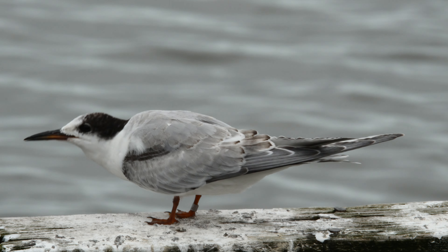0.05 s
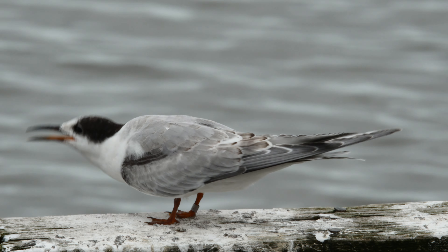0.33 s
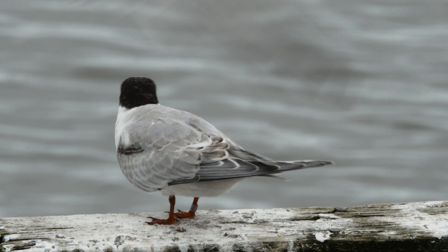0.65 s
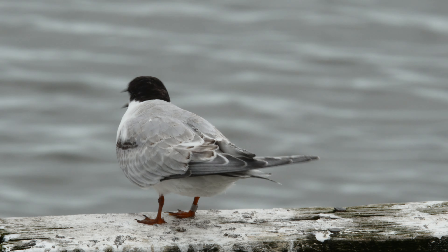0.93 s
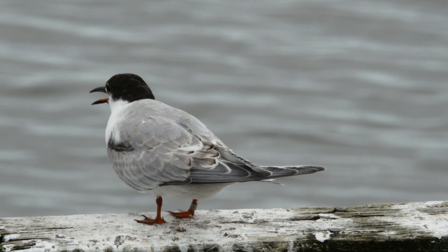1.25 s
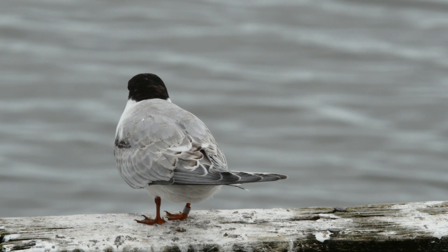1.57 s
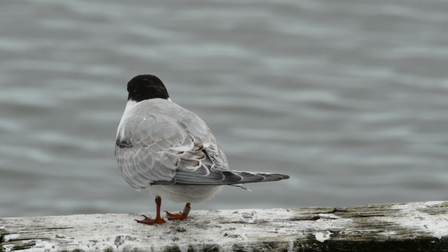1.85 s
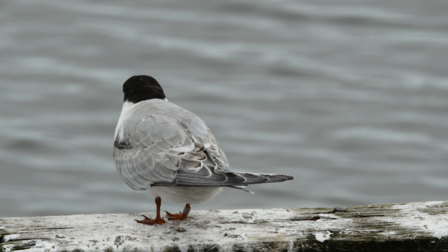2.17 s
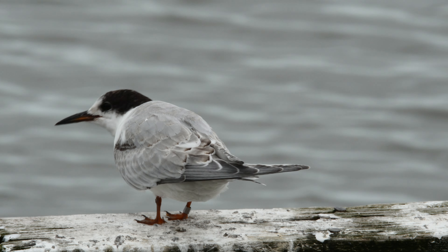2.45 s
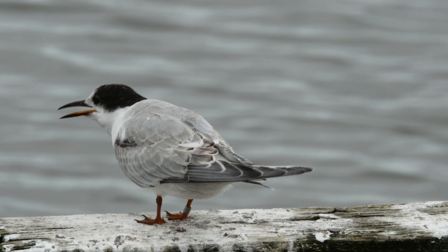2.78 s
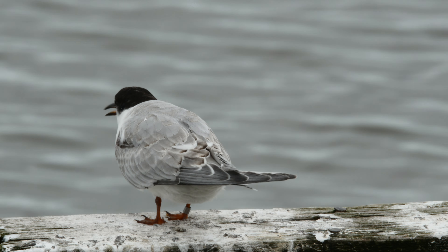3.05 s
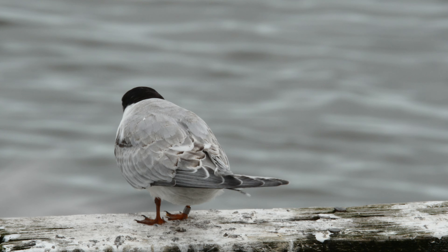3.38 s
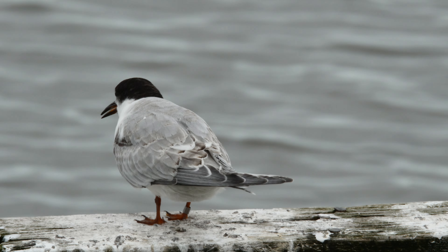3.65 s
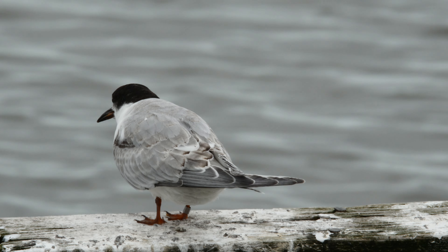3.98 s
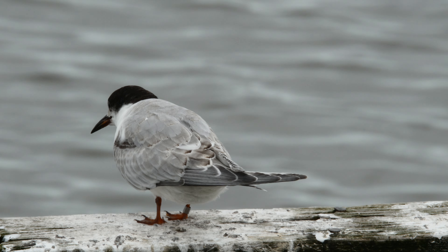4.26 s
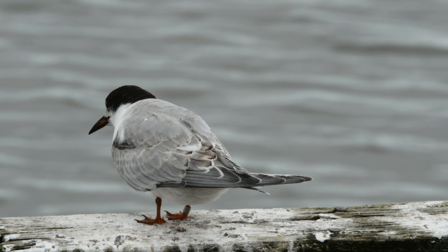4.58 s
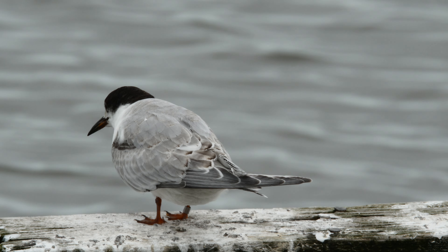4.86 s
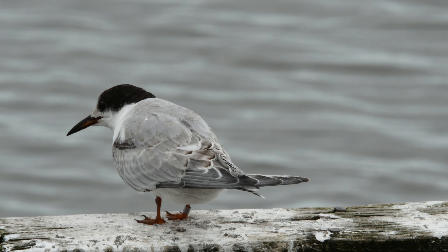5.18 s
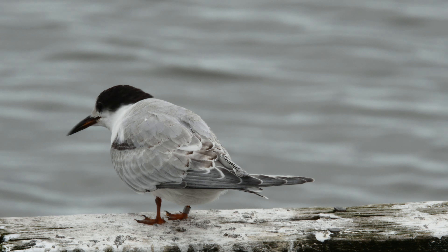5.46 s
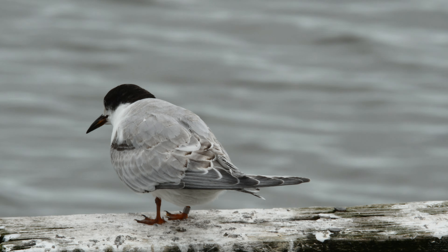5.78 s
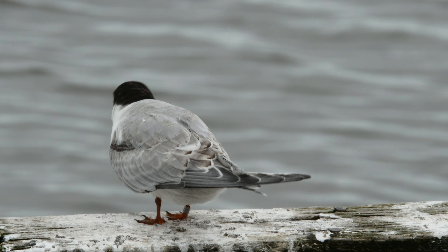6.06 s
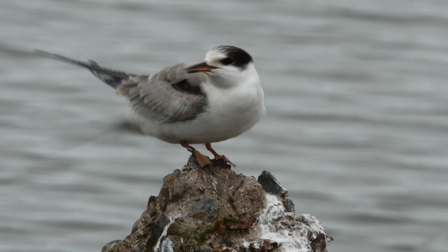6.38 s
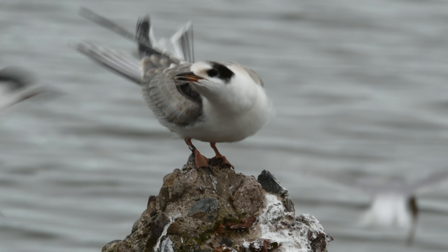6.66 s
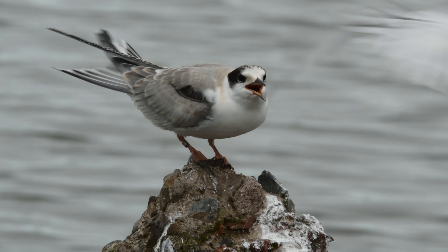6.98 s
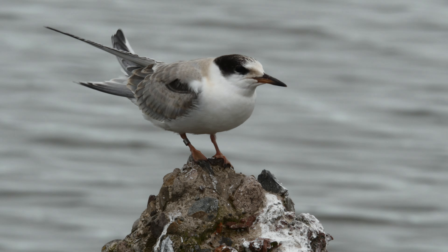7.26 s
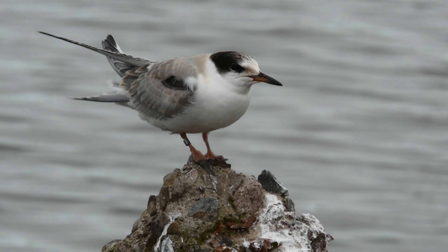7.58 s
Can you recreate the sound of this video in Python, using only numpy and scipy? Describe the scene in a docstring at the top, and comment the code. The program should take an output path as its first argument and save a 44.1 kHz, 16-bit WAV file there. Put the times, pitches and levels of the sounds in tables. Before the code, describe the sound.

From the start, terns call close by and slightly to the left, with high, trilled cries overlapping a nearly unbroken run of harsh rasps. A distant colony chorus and a faint, low wash of wind and waves lie underneath. A steep squawk comes at about 0.8 seconds and a soft, deeper croak at 2.5. The calls are strongest for the first three seconds, ease a little, then swell again with another squawk near 5.9. At about 6.4 seconds the sound drops out for an instant and returns at a quieter spot on the shore, with gentle water noise and thin, far calls. One hoarse, stuttering screech runs from 6.8 to 7.1 seconds, followed at 7.2 by a sharp, close kip. A few soft splashes and swishes come between 6.6 and 7.8 seconds, with a last faint call just before the end, near 8 seconds.

```python
"""A tern colony by the water. Near the microphone, trilled, arching cries around 3 kHz (the syrinx
sounding a tone) overlap with harsh rasps (its slaps ringing throat and beak), over a far chorus and
a low wash of wind and waves. After a brief dropout comes a quieter spot on the shore: thin far
calls, one hoarse screech, a sharp close "kip" and a few soft splashes."""
import sys
import numpy as np
from scipy import signal
from scipy.fft import rfft, irfft
from scipy.io import wavfile
from scipy.ndimage import uniform_filter1d, map_coordinates

SR = 44100
rng = np.random.default_rng(int(sys.argv[2]) if len(sys.argv) > 2 else 0)


def generate_wav(signal):
    """Clip the signal to [-1, 1] and save it as 16-bit WAV at the path in sys.argv[1]."""
    frames = np.transpose(np.atleast_2d(signal))
    scaled = np.clip(frames, -1, 1) * 32767
    pcm = np.round(scaled).astype(np.int16)
    wavfile.write(sys.argv[1], SR, pcm)


N = 344862
TIME = np.arange(N) / SR
COLONY_END_S, SHORE_START_S = 6.358, 6.388
TRILL_DEPTH = .5
VOICED = .6   # share of a rasp's power in its reedy pulses


def from_db(db):
    """Decibels to gain."""
    return 10 ** (np.asarray(db) / 20)


def rms_one(x):
    """Scale to unit power."""
    return x / np.sqrt(np.mean(x ** 2) + 1e-20)


def at_hz(points, hz):
    """Read a spectrum on a log-frequency axis."""
    f, value = np.transpose(points)
    return np.interp(np.log(hz + 1e-3), np.log(f), value)


def drift(rate, size=N):
    """A random curve of spread about 1 that turns rate times a second."""
    at = np.arange(size) * rate / SR + rng.random()
    knots = int(at[-1]) + 2
    return 1.2 * np.interp(at, np.arange(knots), rng.standard_normal(knots))


def phase_of(hz):
    """Running phase of a changing frequency."""
    return 2 * np.pi * np.cumsum(hz) / SR


def ramp(start, length):
    """Rises from 0 to 1 over length seconds."""
    return np.clip((TIME - start) / length, 0, 1)


def swelling(u, swell_db):
    """A rounded unit-power envelope over u = 0..1, leaning towards its start or end."""
    return rms_one(np.abs(np.sin(np.pi * u)) ** .35 * from_db(swell_db * u))


def resonate(x, modes):
    """Parallel resonances (f/Hz, width/Hz, relative level/dB); unit power."""
    out = 0
    for hz, width, db in modes:
        band = [max(hz - width / 2, 15), min(hz + width / 2, .45 * SR)]
        out += from_db(db) * signal.sosfilt(signal.butter(2, band, "band", fs=SR, output="sos"), x)
    return rms_one(out)


def bend(x, speed):
    """Read a sound at a changing speed, moving pitch and resonances together."""
    return map_coordinates(x, [np.cumsum(speed)], order=3, mode="mirror")


def place(x, pan_db, lag=.6):
    """Pan by left minus right level; the left microphone leads by a fraction of a sample."""
    left, right = gains = from_db([pan_db / 2, -pan_db / 2])
    late = (1 - lag) * x + lag * np.roll(x, 1)
    return np.array([left * x, right * late]) / gains.mean()


def add(out, start, sound):
    """Mix a stereo sound in at start seconds."""
    i = int(np.clip(start * SR, 0, N - 1))
    out[:, i:i + sound.shape[1]] += sound[:, :N - i]


def syrinx(pitch, harmonics_db, rough, flutter=.5, side_db=-60):
    """A membrane tone that shakes when forced; flutter, at a share of the pitch, adds side tones."""
    size = len(pitch)
    phase = phase_of(pitch * (1 + .03 * rough * drift(1100, size)))
    flicker_db = 5.5 * np.sqrt(rough)
    tone = sum(from_db(db + flicker_db * np.tanh(drift(35, size))) * np.sin(k * phase)
               for k, db in enumerate(harmonics_db, 1))
    flutter_phase = phase_of(flutter * pitch * (1 + .16 * drift(500, size)))
    sides = np.sin(phase + flutter_phase) + from_db(-13) * np.sin(phase - flutter_phase)
    sides *= from_db(side_db + 5.3 * drift(25.2, size))
    shimmer = 1 + .34 * rough * drift(1400, size)
    return np.sqrt(2) * (tone + sides) * shimmer


def contour(hz, glide, arch):
    """First, middle and last pitch of a call; glide and arch are shares of the pitch."""
    return hz * (1 - arch - glide / 2), hz, hz * (1 - arch + glide / 2)


def overtones(hz, db):
    """Levels of four harmonics after throat and beak."""
    # response of throat and beak: f/Hz, level/dB
    colour = [(5000, -1), (5800, -1.5), (6500, 1), (7200, -8), (8000, -17), (8800, -7), (9900, -3),
              (11000, -5), (11800, -16), (13500, -22)]
    return [0, *(db + at_hz(colour, hz * np.arange(2, 5)))]


def cry(length, pitches, swell_db, harmonics_db, trill, rough, flutter, side_db, trill_hz=60):
    """One note through three pitches, chopped by a fast trill that also bends it."""
    size = max(int(length * SR), 256)
    u = np.linspace(0, 1, size)
    beat = np.sin(phase_of(trill_hz * (1 + .12 * drift(26.6, size))))
    pitch = np.polyval(np.polyfit([0, .5, 1], pitches, 2), u)
    pitch *= 1 - .04 * np.exp(-u * length / .009)   # scoops up to the note
    pitch *= 1 + .008 * trill * beat + .009 * drift(150, size)
    chop = 1 + trill * np.tanh(1.34 * beat + .46)
    return rms_one(swelling(u, swell_db) * chop * syrinx(pitch, harmonics_db, rough, flutter, side_db))


def single_cries(trim_db=1.0, arch=.007):
    """Birds that stand out, each from its own direction; rough cries trill and flutter more."""
    # start t/s, end t/s, f/Hz, glide/share, level/dB, swell/dB, overtones/dB, roughness/0-1, pan/dB
    cries = [(0, .141, 2920, -.05, -54, -12, -3, .46, -11), (0, .116, 3210, -.01, -47.5, -17, -19, .56, -7),
             (.138, .25, 3300, .02, -43.5, -4, -11, .23, -4),
             (.323, .585, 3330, .02, -48, -11, -13.5, .9, -6),
             (.856, .985, 3295, -.06, -46, 6, -18, .28, -5),
             (.945, 1.04, 3780, -.03, -52, -3, -18, .45, -6),
             (.955, 1.14, 2900, -.055, -49, -3, -11, .4, -5), (.97, 1.1, 3190, -.02, -54, -3, -20, .5, -6),
             (1.255, 1.43, 3395, -.02, -54.5, -11, -6.5, .36, -1.5),
             (1.36, 1.493, 3160, .01, -55, -20, -22, .5, -9),
             (1.365, 1.45, 3760, .01, -55, -2, -22, .5, -7),
             (1.542, 1.708, 2937, .01, -51, -5.5, -9, .4, -2.5),
             (1.686, 1.83, 3060, -.02, -49.5, -3, -19, .7, -8),
             (1.795, 2.06, 3180, -.035, -52.5, -9, -11, .64, -2),
             (2.152, 2.268, 2900, .065, -52.5, 10, -9, .55, -11),
             (2.244, 2.422, 3290, -.04, -44.5, 2, -14.5, .25, -7.5),
             (2.26, 2.43, 2970, -.01, -54, -2, -18, .55, -8), (2.34, 2.43, 4050, 0, -53, 3, -26, .6, -7),
             (2.465, 2.62, 3200, -.07, -49.5, -3, -18, .35, -8),
             (2.485, 2.661, 2860, -.03, -52.5, 1, -13, .55, -4),
             (2.653, 2.769, 3200, .01, -57, -1, -3, .4, 1),
             (2.775, 2.96, 3220, .05, -49.5, -3, -22, .3, -4),
             (3.11, 3.25, 2960, .02, -57, 0, -10, .6, -10),
             (3.22, 3.377, 2640, -.02, -60, -6, -23, .77, -9), (3.34, 3.5, 3360, .07, -64, 0, -24, .5, -6),
             (3.48, 3.69, 3080, -.09, -60, -2, -24, .6, -6),
             (3.548, 3.723, 2530, -.14, -57, -11, -20, .84, -9),
             (3.74, 3.869, 3550, -.16, -56, 5, -14, .3, -8),
             (3.766, 3.982, 2770, -.095, -54.5, -2, -14, .42, -4),
             (4.271, 4.498, 3393, -.11, -51.5, 6, -19, .4, -10),
             (4.5, 4.63, 3030, -.05, -63, 0, -7, .5, -6), (4.59, 4.79, 2850, -.11, -58, -2, -16, .35, -2),
             (4.822, 4.97, 3004, -.03, -63, 4, -7.5, .46, -3),
             (4.947, 5.12, 3327, -.12, -56, -3, -20, .51, -12),
             (5.08, 5.22, 3220, 0, -60, -3, -18, .45, -8), (5.21, 5.32, 3060, -.03, -60, 2, -9, .4, -5),
             (5.286, 5.47, 2850, -.065, -56.5, -4, -10, .55, -6),
             (5.535, 5.66, 3350, -.1, -59, 0, -6, .55, -9),
             (5.597, 5.648, 3110, .01, -51, 6, -23, .25, -13),
             (5.666, 5.773, 2950, -.02, -62, -8, -22, .4, -8),
             (5.804, 5.919, 3380, .03, -53.5, 8, -33, .42, -11),
             (6.024, 6.112, 3510, 0, -48, 1, -30, .65, -14),
             (6.33, 6.62, 3390, -.035, -76.5, -2, -16, 0, -1),
             (7.12, 7.218, 3330, -.03, -69, 6, -18, .03, 17), (7.742, 7.86, 2805, -.01, -69, 5, -18, 0, 11)]
    out = np.zeros((2, N))
    for row, flutter in zip(cries, rng.uniform(.17, .36, len(cries))):
        start, end, hz, glide, db, swell_db, overtone_db, rough, pan_db = row
        trill = TRILL_DEPTH * np.tanh(6 * rough)
        note = cry(end - start, contour(hz, glide, arch), swell_db, overtones(hz, overtone_db),
                   trill, rough, flutter, side_db=-19 + 9 * rough)
        add(out, start, from_db(db + trim_db) * place(note, pan_db))
    return out


def hoarse_pulses(size, pulse_hz, trill_db=2.5, trill_hz=58, burst_s=.00079, breath=.47, buzz=.3):
    """The syrinx slaps shut at uneven intervals: each slap is a click and a burst of turbulence."""
    cycles = np.cumsum(pulse_hz * np.exp(.2 * drift(150, size) + .15 * drift(10, size))) / SR
    slaps = np.diff(np.floor(cycles), prepend=0) * from_db(2 * np.clip(rng.standard_normal(size), -2, 2))
    bursts = rms_one(signal.lfilter([1], [1, -np.exp(-1 / (burst_s * SR))], slaps + 1e-18))
    trill = np.sin(phase_of(trill_hz * np.exp(.25 * drift(20, size))))
    turbulence = (bursts + breath) * rng.standard_normal(size)
    flow = (buzz * rms_one(slaps) + turbulence) * from_db(trill_db * trill)
    local_power = np.abs(uniform_filter1d(flow ** 2, SR // 25))
    return flow / np.sqrt(local_power + 1e-9)


def reedy_pulses(size, pulse_hz, trill_db=3.5, trill_hz=52, uneven_db=3.0):
    """The voiced part of a rasp: nearly regular slaps of uneven strength, under a trill."""
    cycles = np.cumsum(pulse_hz * (1 + .02 * drift(400, size) + .012 * drift(25, size))) / SR
    trill = np.sin(phase_of(trill_hz * (1 + .15 * drift(20, size))))
    strength = from_db(uneven_db * drift(600, size) + trill_db * trill)
    return rms_one(np.diff(np.floor(cycles), prepend=0) * strength)


def near_rasps(mouth_hz=5950, arch=.02, pan_db=-6.2):
    """Harsh "kaar" calls nearby: pulses ring throat, mouth and chest; the open beak hisses."""
    # start t/s, end t/s, lower throat f/Hz, upper throat f/Hz, pulse f/Hz, upper throat level/dB,
    # swell/dB, then relative to the upper throat: mouth/dB, chest/dB, beak/dB
    rasps = [(0, .316, 3450, 4100, 412, -51, -.5, -15, -18, -16),
             (.312, .735, 3300, 4200, 365, -51, -5, -11, -14, -11.5),
             (.825, .968, 3450, 4000, 415, -55.5, -4, -14, -18.5, -11),
             (.953, 1.287, 3170, 3800, 420, -50.5, -1, -14, -18, -13.5),
             (1.352, 1.556, 3230, 3850, 535, -56, -6, -18, -17, -28),
             (1.544, 1.766, 3020, 3850, 415, -57, 2, -8, -15, -8.5),
             (1.788, 2.133, 3170, 3900, 525, -59, -3, -18, -17, -30),
             (2.159, 2.492, 3270, 4000, 405, -54, 8, -13, -30, -17),
             (2.472, 2.729, 3050, 4550, 395, -57, 0, -6, -16, -11),
             (2.721, 2.981, 3270, 4300, 400, -56, -.5, -7, -16.5, -12),
             (2.949, 3.261, 3080, 4200, 375, -53, -6, -9, -18.5, -16),
             (3.222, 3.413, 3170, 4400, 440, -68, -4, -10, -11.5, -21),
             (3.469, 3.733, 3200, 4400, 440, -65, -13, -10, -12, -26),
             (3.739, 4.135, 3010, 3920, 370, -61, .5, -10, -13, -12),
             (4.248, 4.619, 3260, 4000, 440, -62, -8, -9, -15, -10),
             (4.581, 4.857, 2910, 3900, 365, -66, 5, -7, -7, -13),
             (4.821, 5.234, 3100, 3980, 435, -63, -2, -5, -12, -9.5),
             (5.269, 5.509, 3000, 4700, 385, -60.5, 3, -5, -10.5, -11.5),
             (5.5, 5.817, 3000, 4500, 430, -65, -5, -6, -9.5, -7.5),
             (5.852, 6.202, 3200, 4450, 497, -53.5, 0, -10, -12.5, -9),
             (6.162, 6.431, 3250, 4400, 460, -60.5, 2, -8, -13, -7)]
    # resonances of chest and open beak: f/Hz, width/Hz, level/dB
    chest_modes = [(850, 248, -6), (1220, 240, -2.5), (1633, 180, 2), (2000, 380, 1)]
    beak_modes = [(9670, 350, -14), (9600, 1800, 8), (11900, 1900, 3), (13400, 4600, 1)]
    out = np.zeros((2, N))
    for start, end, lower_hz, upper_hz, pulse_hz, db, swell_db, mouth_db, chest_db, beak_db in rasps:
        u = np.linspace(0, 1, int((end - start) * SR))
        padded = len(u) + 2000
        hoarse = hoarse_pulses(padded, pulse_hz)
        pulses = np.sqrt(VOICED) * reedy_pulses(padded, pulse_hz) + np.sqrt(1 - VOICED) * hoarse
        lower_db = -52.5 + .78 * (db + 52)   # grows less than the rest: a harder rasp is brighter
        lower = from_db(lower_db) * resonate(pulses, [(lower_hz, 560, 0)])
        upper = resonate(pulses, [(upper_hz, 860, 0)])
        flank = from_db(-11) * resonate(hoarse_pulses(padded, pulse_hz), [(upper_hz, 1720, 0)])
        mouth = from_db(mouth_db) * resonate(np.roll(pulses, 300), [(mouth_hz, 1100, 0)])
        chest = from_db(chest_db) * resonate(hoarse, chest_modes)
        beak = from_db(beak_db) * resonate(hoarse, beak_modes)
        voice = lower + from_db(db) * (upper + flank + mouth + chest + beak)
        # the resonances rise and fall as the beak opens and closes
        voice = bend(voice, 1 + arch * (np.sin(np.pi * u) - 2 / np.pi))
        add(out, start, place(swelling(u, swell_db) * voice, pan_db + rng.uniform(-1.2, 1.2)))
    return out


def far_chorus(count=70, centre_hz=3080, spread=.16, level_db=-64):
    """Many distant birds give the same falling cry, each at its own pitch; their rasps merge."""
    # resonances of the far throats: f/Hz, width/Hz, level/dB
    throat = [(1813, 460, -5), (2990, 590, 0), (4170, 890, -5.5), (6070, 480, -10), (9900, 1660, -13),
              (12800, 2200, -19)]
    cries = np.zeros((2, N))
    for k, (when, length, height, side) in enumerate(rng.random((count, 4))):
        hz = centre_hz * (1 + spread * (2 * height - 1))
        note = cry(.15 + .2 * length, (hz * 1.1, hz, hz * .94), swell_db=0, harmonics_db=[0, -16, -24],
                   trill=.99, rough=.6, flutter=.25 + .25 * when, side_db=-9)
        start = (k + when) / count * COLONY_END_S - .15
        add(cries, start, place(note, -4 + 10 * (side - .5)))
    rasps = np.array([resonate(hoarse_pulses(N, pulse_hz=500), throat) for _ in range(2)])
    return from_db(level_db) * (rms_one(cries) + rasps * from_db([[-1.5], [1.5]]))


def wash(spectrum):
    """Far wind and waves: gently wavering noise, most alike at both microphones in the low range."""
    # likeness of left and right: f/Hz, correlation/0-1
    likeness = [(30, 0.41), (90, .75), (180, 0.83), (350, 0.93), (700, 0.54), (1500, 0.1), (12000, 0.55)]
    hz = np.fft.rfftfreq(N, 1 / SR)
    mid, side = rfft(rng.standard_normal((2, N)))
    alike = at_hz(likeness, hz)
    stereo = np.sqrt(1 + alike) * mid + np.sqrt(1 - alike) * side * [[1], [-1]]
    noise = irfft(from_db(at_hz(spectrum, hz)) * stereo, N)
    return rms_one(noise) * from_db(.6 * drift(7))


def far_drone(level_db=-80):
    """A faint drone in the distance: three narrow bands of noise."""
    # drone bands: f/Hz, width/Hz, level/dB
    bands = [(94, 24, -22.5), (144, 17.5, -15), (442.4, 24, -17.5)]
    return from_db(level_db) * resonate(rng.standard_normal(N), bands)


def low_tones(trim_db=-3.0):
    """Low hoarse tones under the cries, including the undertones of the second squawk."""
    # start t/s, end t/s, f/Hz, glide/share, level/dB
    tones = [(.32, .44, 1650, .05, -67), (2.47, 2.63, 1890, 0, -66), (3.11, 3.27, 1610, .02, -59),
             (3.84, 4.06, 1880, -.04, -70), (4.6, 4.86, 1820, -.1, -69), (5.28, 5.5, 1950, -.02, -69),
             (5.54, 5.86, 1750, -.03, -70), (5.87, 6.03, 1540, .03, -66), (5.87, 6.04, 2340, .03, -59)]
    out = np.zeros((2, N))
    for start, end, hz, glide, db in tones:
        note = cry(end - start, contour(hz, glide, arch=.015), swell_db=0, harmonics_db=[0, -8],
                   trill=TRILL_DEPTH, rough=1.7, flutter=.1, side_db=-6)
        add(out, start, from_db(db + trim_db) * place(note, pan_db=-8))
    return out


def squawks():
    """Steeply arched cries to the right, forced until the membrane flutters at half the pitch."""
    # start t/s, end t/s, f/Hz, glide/share, arch/share, level/dB, swell/dB, overtones/dB, side tones/dB
    calls = [(.745, .85, 3230, .13, .12, -53, -11, -7, -10), (5.91, 6.04, 3150, -.03, .06, -50, -1, 5, -2)]
    out = np.zeros((2, N))
    for start, end, hz, glide, arch, db, swell_db, overtone_db, side_db in calls:
        harmonics_db = overtones(hz, overtone_db) + np.array([0, 0, -9, 0])
        note = cry(end - start, contour(hz, glide, arch), swell_db, harmonics_db,
                   trill=.6, rough=.45, flutter=.5, side_db=side_db)
        add(out, start, from_db(db) * place(note, pan_db=-12.5))
    return out


def low_croak(start_s=2.5, length_s=.25, level_db=-65.5, pulse_hz=300):
    """A deeper-voiced bird croaks once: slapping pulses in a larger throat."""
    # throat resonances: f/Hz, width/Hz, level/dB
    throat = [(740, 180, -5), (1180, 260, -3), (1830, 380, 0)]
    out = np.zeros((2, N))
    u = np.linspace(0, 1, int(length_s * SR))
    voice = swelling(u, swell_db=-7) * resonate(hoarse_pulses(len(u), pulse_hz), throat)
    add(out, start_s, from_db(level_db) * place(voice, pan_db=-5))
    return out


def scatter(x, t60, wet_db, delay_s, dull_hz, thin_hz):
    """Rocks and water throw a diffuse, duller tail back to the microphone."""
    t = np.arange(int(.8 * SR)) / SR
    tail = rng.standard_normal((2, len(t))) * from_db(-60 * t / t60) * (t > delay_s)
    tail = signal.sosfilt(signal.butter(1, dull_hz, fs=SR, output="sos"), tail)
    # small ripples and stones scatter short waves best
    tail = signal.sosfilt(signal.butter(2, thin_hz, "high", fs=SR, output="sos"), tail)
    tail /= np.sqrt(np.sum(tail ** 2, axis=1, keepdims=True))
    narrowed = (x + x.mean(axis=0)) / 2
    return x + from_db(wet_db) * signal.fftconvolve(narrowed, tail, axes=1)[:, :N]


def fading_hum(hz=212, width_hz=39, level_db=-76):
    """A faint hum of narrow-band noise that dies away."""
    hum = resonate(rng.standard_normal(N), [(hz, width_hz, 0)])
    return from_db(level_db) * hum * (1 - ramp(6.85, .25))


def swishes(spray_db=1.5, spray_hz=7500):
    """Wavelets and passing wings: a dull burst with hiss on top."""
    # t/s, level/dB, length/s, centre f/Hz
    bursts = [(6.633, -71.5, 0.055, 905), (6.798, -67.5, 0.3, 600), (7.2, -73, .9, 1620),
              (7.454, -65.5, 0.066, 1450), (7.578, -75, 0.027, 1285), (7.653, -67, 0.024, 287),
              (7.675, -65.5, .03, 1080), (7.734, -66, 0.027, 895)]
    out = np.zeros((2, N))
    for start, db, length, hz in bursts:
        u = np.arange(SR) / SR / length
        envelope = 3 * u * np.exp(1 - 3 * u)
        noise = .97 * rng.standard_normal((2, SR)) + rng.standard_normal(SR)
        body = resonate(noise, [(hz, hz, 0)])
        spray = from_db(spray_db) * resonate(noise, [(spray_hz, 10000, 0)])
        add(out, start, from_db(db) * envelope * (body + spray))
    return out


def screech(start_s=6.785, attack_s=.088, hold_s=.17, release_s=.085, pulse_hz=465, stutter_hz=47):
    """One bird's begging screech: a regular stutter of reedy pulses whose throat climbs as it swells."""
    # throat resonances: f/Hz, width/Hz, level/dB
    throat = [(3270, 400, 0), (3670, 250, 1.5), (5200, 370, -14), (5950, 900, -12.5), (9450, 1200, -17),
              (11000, 580, -22)]
    pulses = (np.sqrt(VOICED) * reedy_pulses(N, pulse_hz, trill_db=0, uneven_db=2)
              + np.sqrt(1 - VOICED) * hoarse_pulses(N, pulse_hz, trill_db=0))
    rise = ramp(start_s, attack_s)
    sag = ramp(start_s + attack_s, hold_s)
    fall = ramp(start_s + attack_s + hold_s, release_s)
    voice = bend(resonate(pulses, throat), 1 - .11 * (1 - rise ** 4))
    envelope_db = -48.7 - 19 * (1 - rise ** 2) - 3 * sag ** 2 - 21 * fall
    stutter_db = 4.5 * np.cos(2 * np.pi * stutter_hz * (TIME - 6.79))
    sounding = (rise > 0) * (fall < 1)
    return place(sounding * from_db(envelope_db + stutter_db) * voice, pan_db=-1)


def kip(start_s=7.203, hold_s=.02, break_s=.03, croak_s=.017, hz=3255, drop_hz=480, chop_hz=200):
    """Close to the microphone, a clear note starts hard, swells, then snaps down into a croak."""
    # harmonics 1-4: level/dB
    harmonics_db = [0, -.5, -3, -19]
    # resonances of the croak: f/Hz, width/Hz, level/dB
    croak_modes = [(3150, 300, 3), (4180, 400, 4), (5450, 600, -3), (8900, 1200, -8)]
    held = ramp(start_s, hold_s)
    broken = ramp(start_s + hold_s, break_s) ** 2
    gate = ramp(start_s, .002) * (1 - ramp(start_s + hold_s + break_s + croak_s, .01))
    chop = 1 + .8 * broken ** .8 * np.sin(phase_of(chop_hz * (1 + .1 * drift(100))))
    croak = from_db(-3) * broken ** 2 * resonate(rng.standard_normal(N), croak_modes)
    pitch = (hz - 45 * (1 - held) - drop_hz * broken) * (1 + .005 * drift(200))
    note = (1 - .5 * broken ** 2) * syrinx(pitch, harmonics_db, rough=.1 + .6 * broken ** 3)
    envelope_db = -38.7 - 4 * (1 - held) - 17 * broken
    return place(gate * chop * from_db(envelope_db) * (note + croak), pan_db=-5)


def water_echo(x, delay_s=.026, echo_db=-15.0):
    """One clear reflection off the water beats against a falling note."""
    return x + from_db(echo_db) * np.roll(x, int(delay_s * SR), axis=1)


def scene():
    """The microphone at the colony, a short dropout, then at the quiet spot on the shore."""
    # spectra of wind and waves at each spot: f/Hz, relative level/dB
    colony_wash = [(15, -45), (25, -5.5), (118, -6.5), (147, -4.5), (269, -11.5), (334, -8), (403, -11),
                   (445, -8), (583, -12.5), (679, -12), (1020, -13.5), (1290, -8.5), (1400, -20),
                   (1820, -42), (3080, -120)]
    shore_wash = [(15, -49), (25, -11.5), (131, -5.5), (213, -7), (286, -9), (856, -13.5), (1390, -19),
                  (1500, -18.5), (2930, -19.5), (3350, -16), (5010, -31), (5720, -19), (6370, -28),
                  (13100, -31.5), (15000, -39)]
    at_colony, at_shore = TIME < COLONY_END_S, TIME > SHORE_START_S
    cries = single_cries()
    colony_birds = cries + squawks() + near_rasps() + low_tones() + low_croak() + far_chorus()
    colony = scatter(colony_birds, t60=.35, wet_db=-6.5, delay_s=.008, dull_hz=8000, thin_hz=600)
    colony += from_db(-72) * wash(colony_wash) * from_db([[-.6], [.6]]) + far_drone()
    shore_birds = at_shore * cries + screech() + water_echo(kip())
    shore = scatter(shore_birds, t60=.38, wet_db=-13.5, delay_s=.012, dull_hz=4500, thin_hz=3900)
    shore += from_db(-67) * wash(shore_wash) + swishes() + fading_hum()
    return at_colony * colony + at_shore * shore


def record(dry):
    """The top is cut steeply."""
    cutoff_hz = 15550
    return signal.sosfilt(signal.ellip(10, .2, 80, cutoff_hz, fs=SR, output="sos"), dry)


dry = scene()
out = record(dry)
generate_wav(out)
```